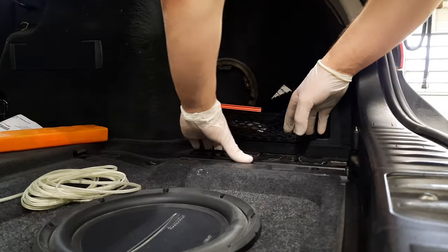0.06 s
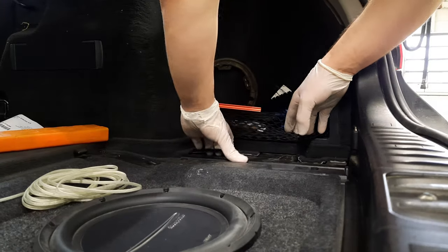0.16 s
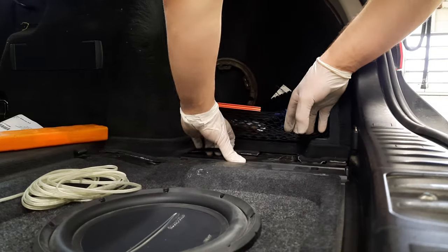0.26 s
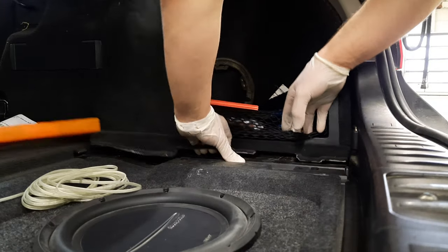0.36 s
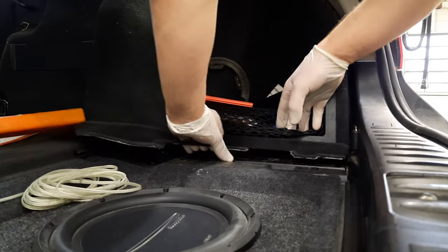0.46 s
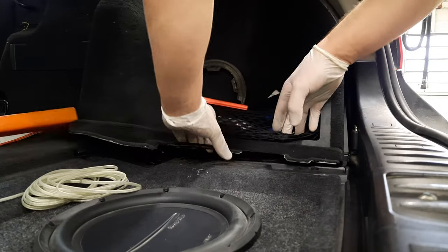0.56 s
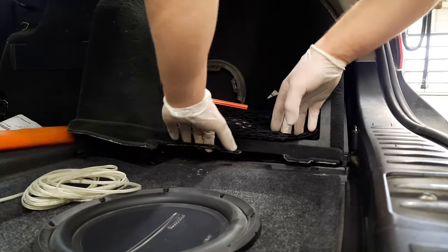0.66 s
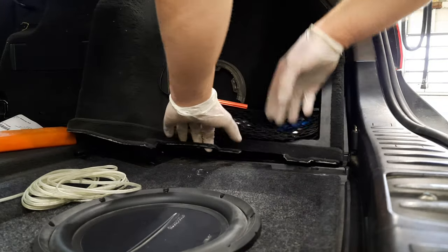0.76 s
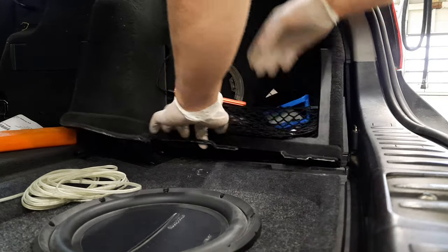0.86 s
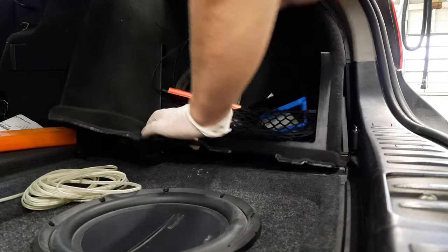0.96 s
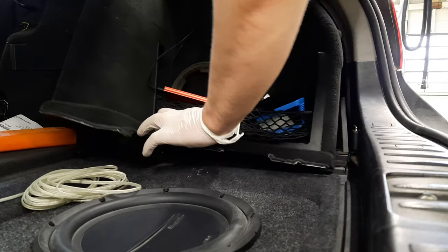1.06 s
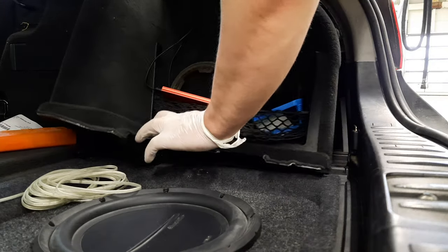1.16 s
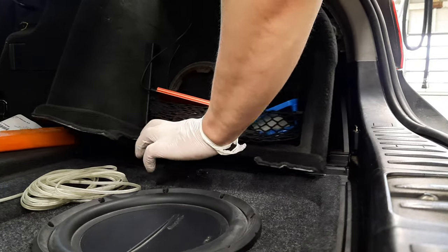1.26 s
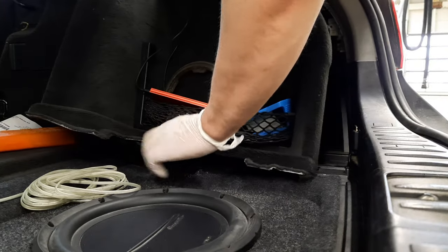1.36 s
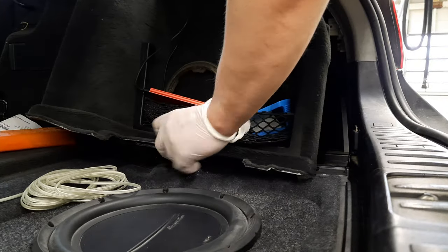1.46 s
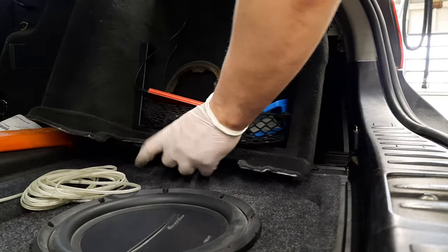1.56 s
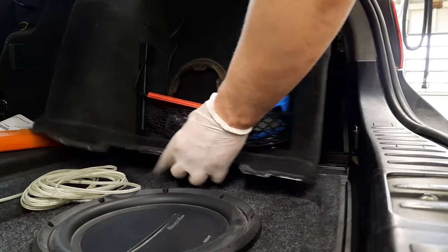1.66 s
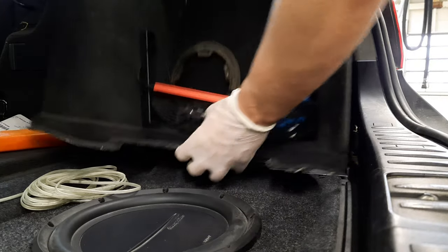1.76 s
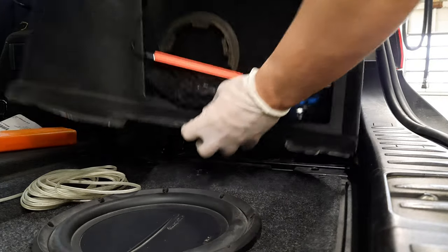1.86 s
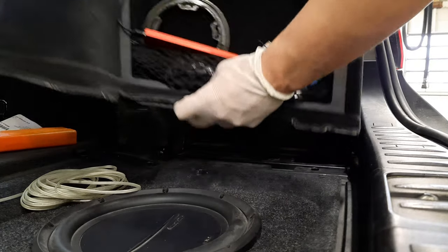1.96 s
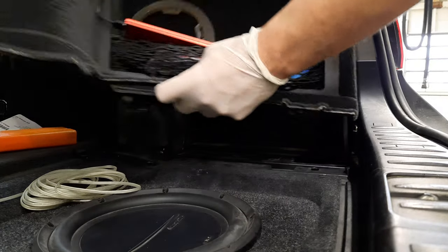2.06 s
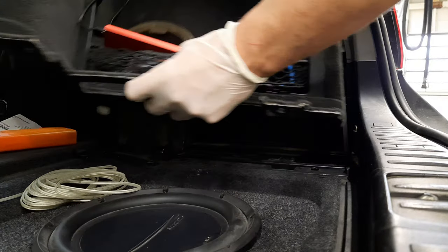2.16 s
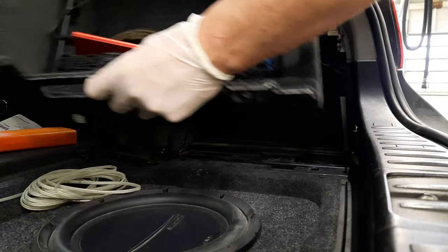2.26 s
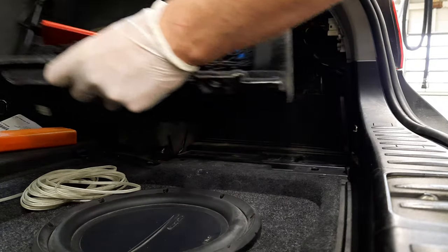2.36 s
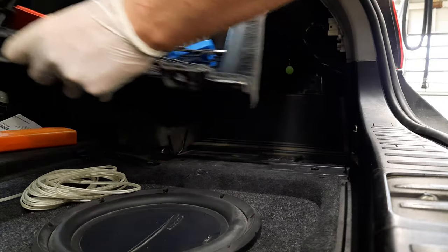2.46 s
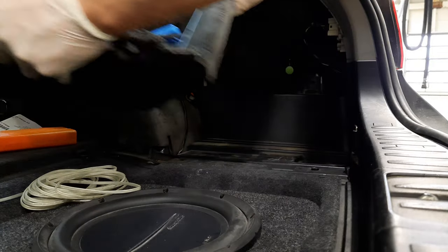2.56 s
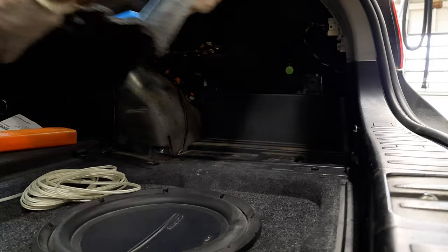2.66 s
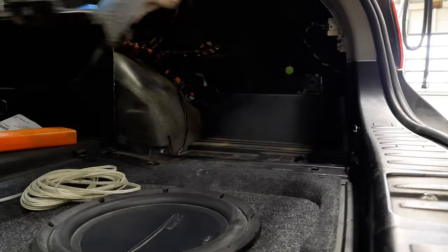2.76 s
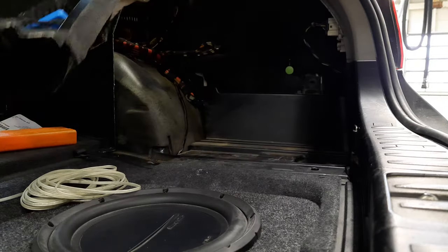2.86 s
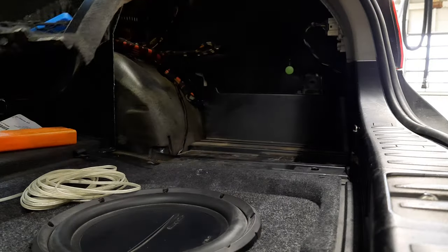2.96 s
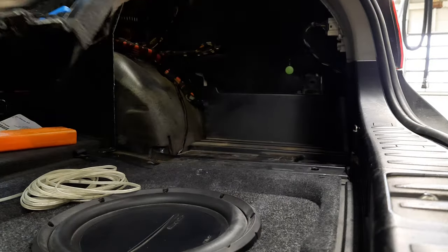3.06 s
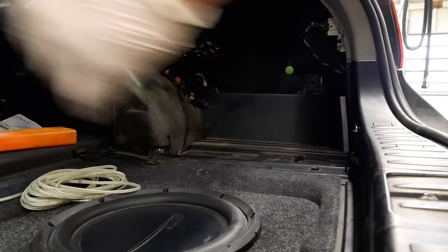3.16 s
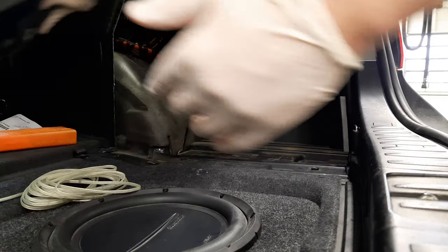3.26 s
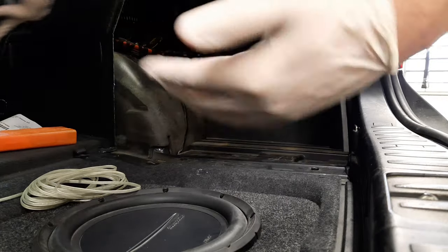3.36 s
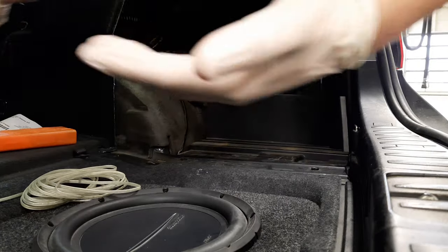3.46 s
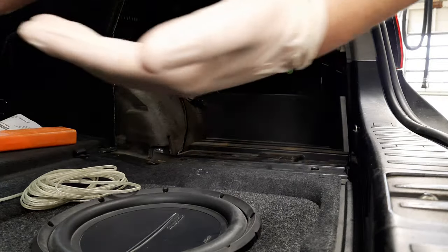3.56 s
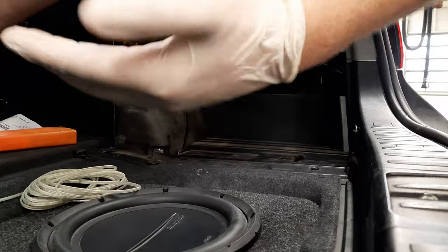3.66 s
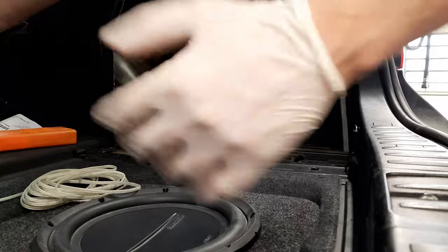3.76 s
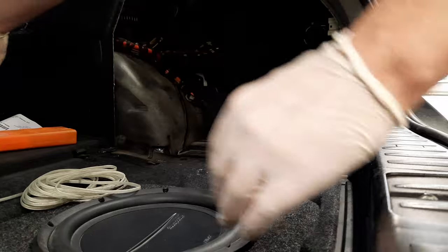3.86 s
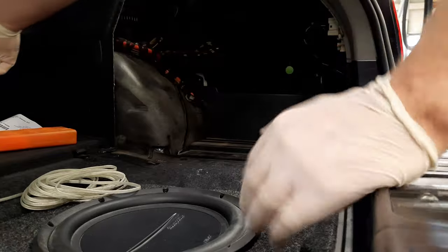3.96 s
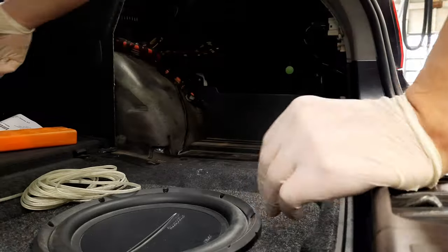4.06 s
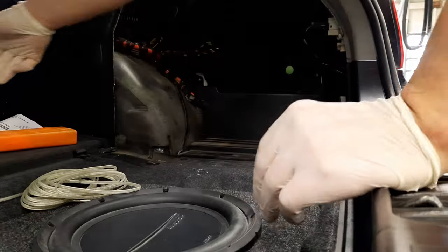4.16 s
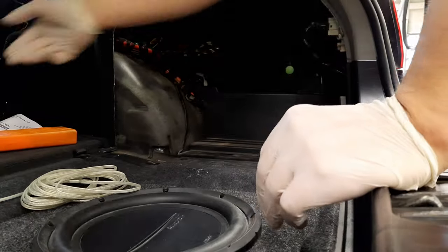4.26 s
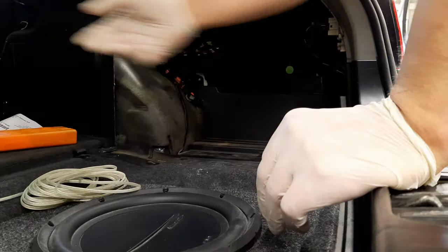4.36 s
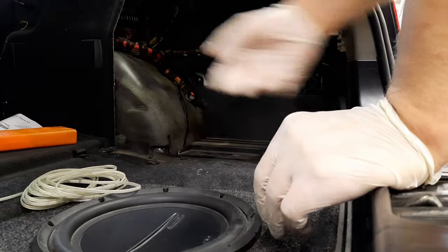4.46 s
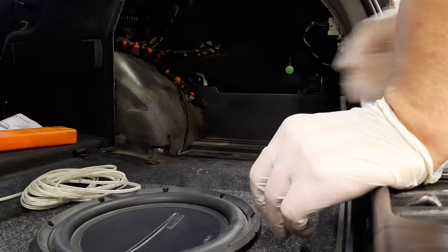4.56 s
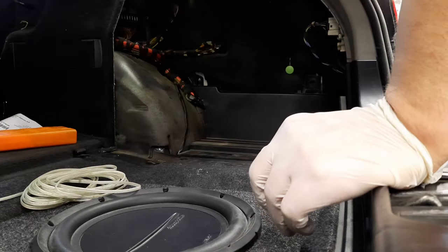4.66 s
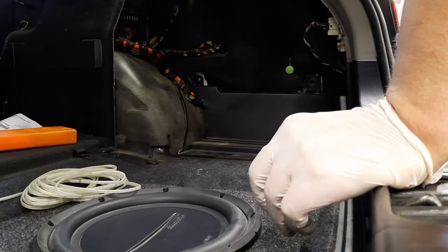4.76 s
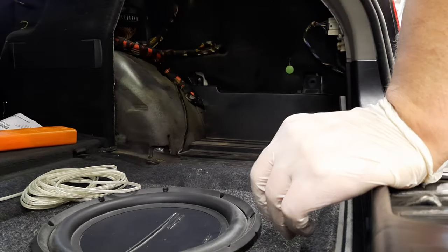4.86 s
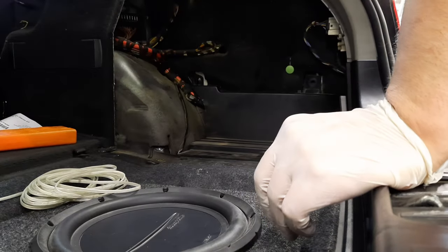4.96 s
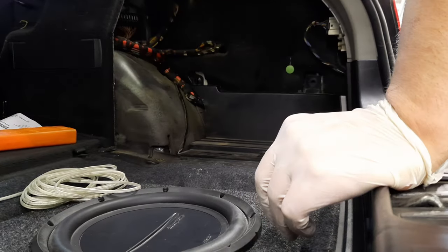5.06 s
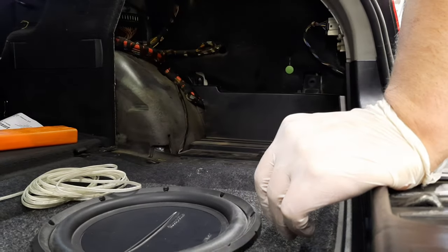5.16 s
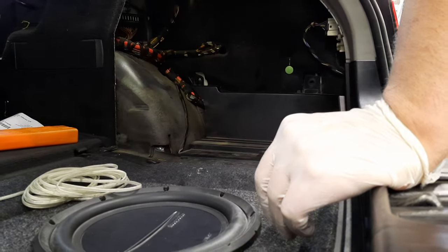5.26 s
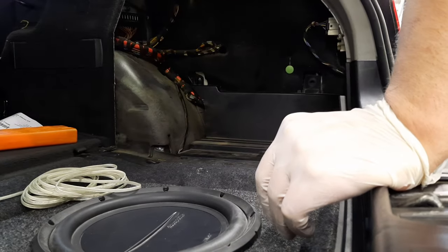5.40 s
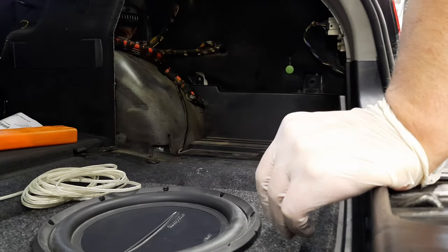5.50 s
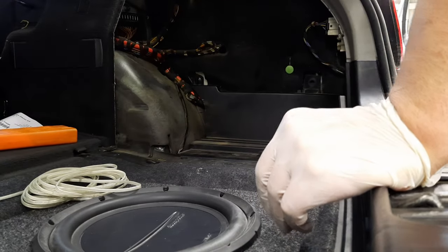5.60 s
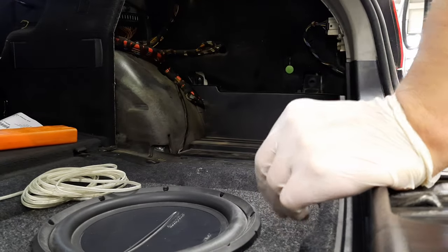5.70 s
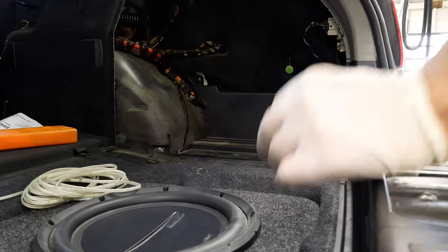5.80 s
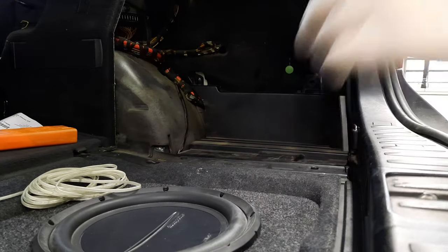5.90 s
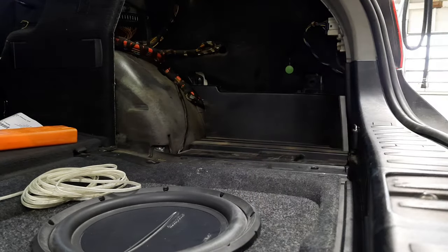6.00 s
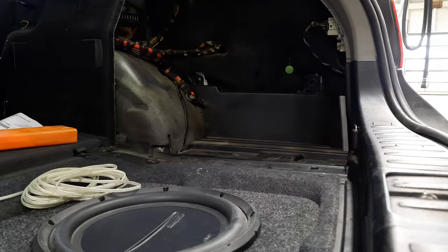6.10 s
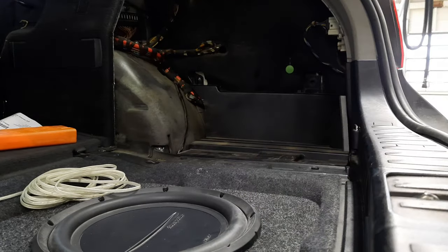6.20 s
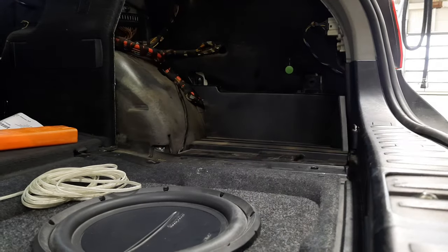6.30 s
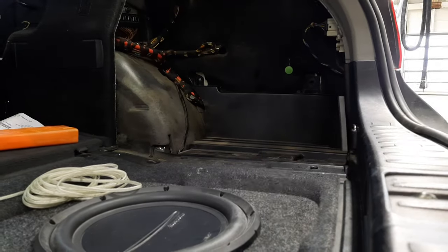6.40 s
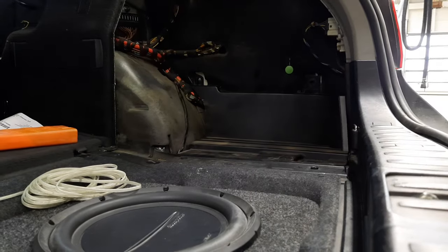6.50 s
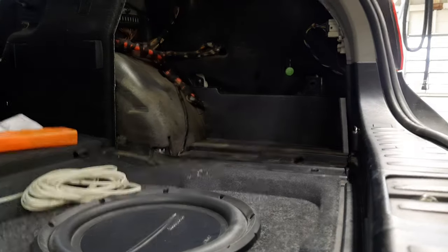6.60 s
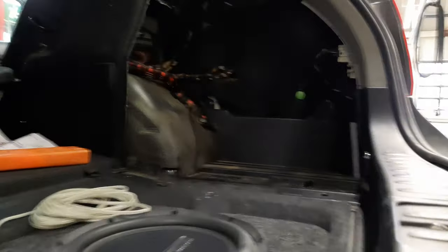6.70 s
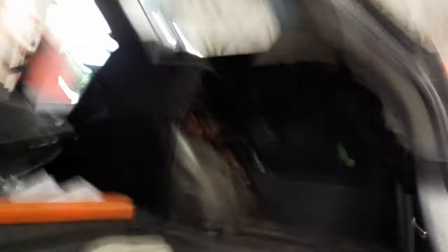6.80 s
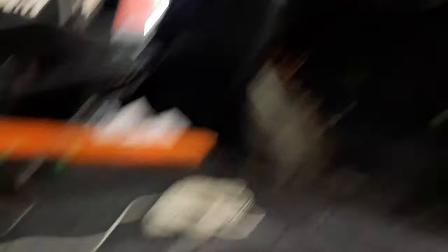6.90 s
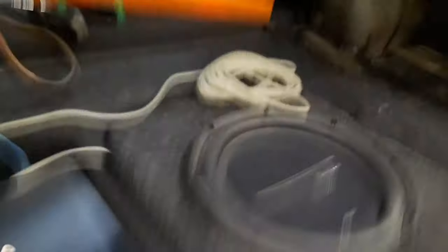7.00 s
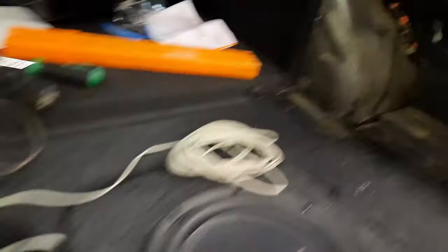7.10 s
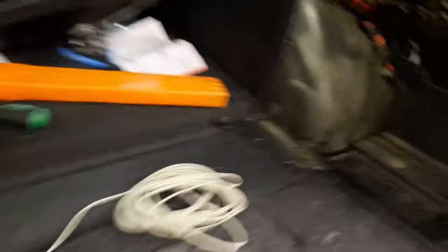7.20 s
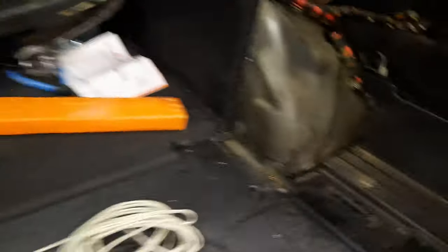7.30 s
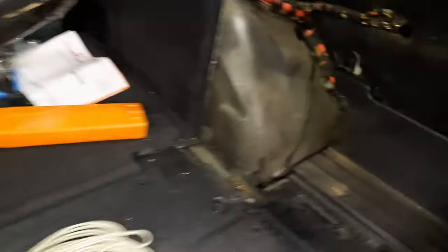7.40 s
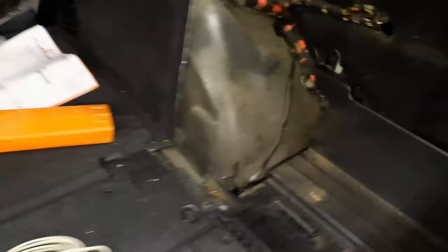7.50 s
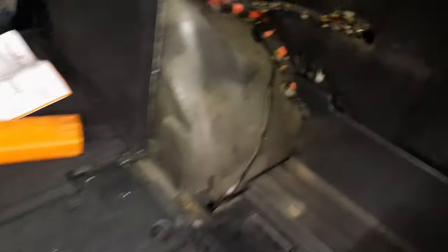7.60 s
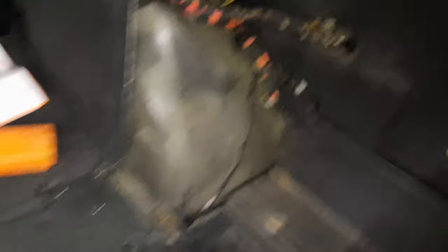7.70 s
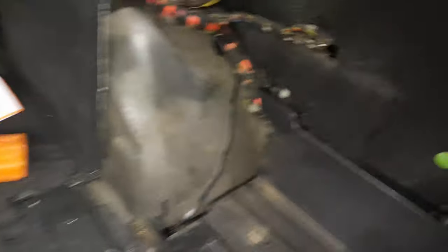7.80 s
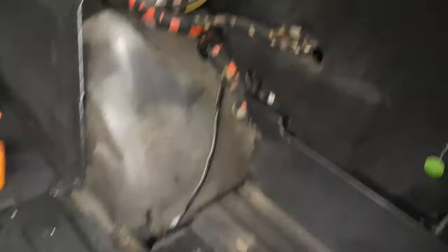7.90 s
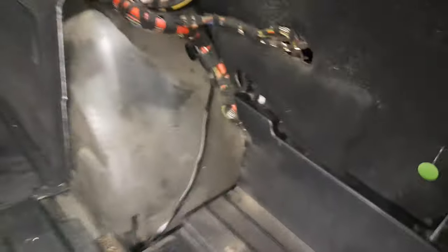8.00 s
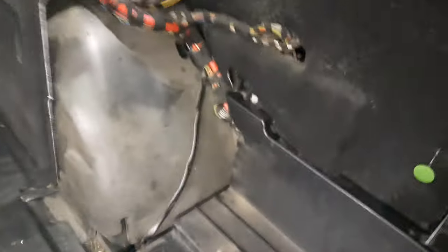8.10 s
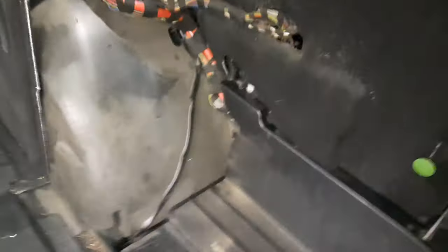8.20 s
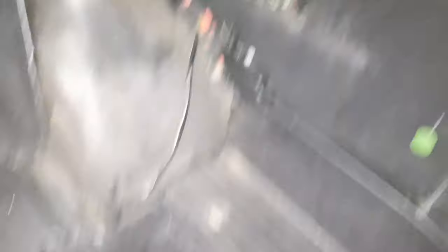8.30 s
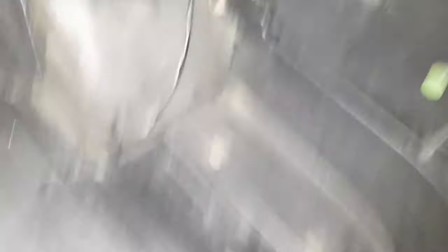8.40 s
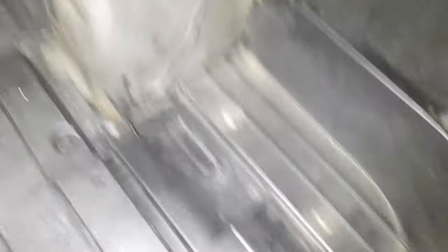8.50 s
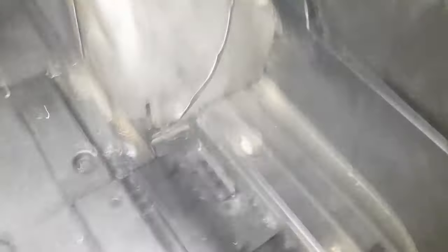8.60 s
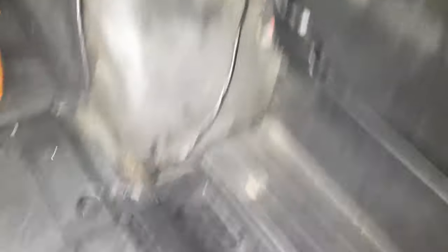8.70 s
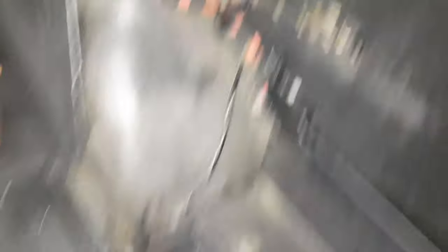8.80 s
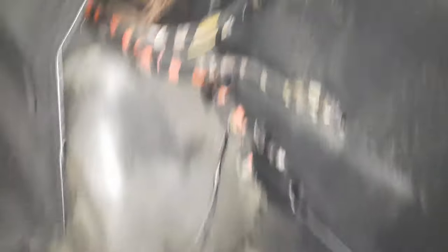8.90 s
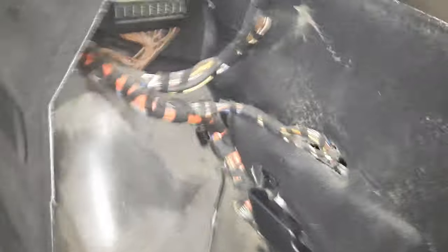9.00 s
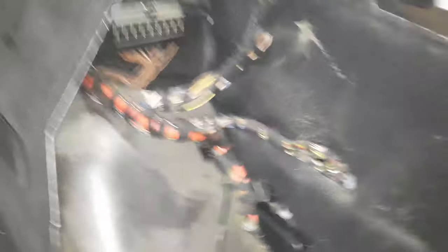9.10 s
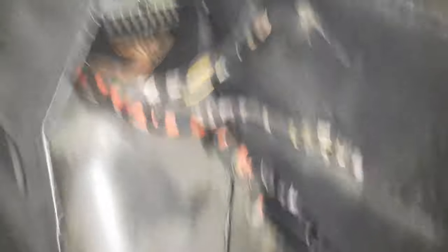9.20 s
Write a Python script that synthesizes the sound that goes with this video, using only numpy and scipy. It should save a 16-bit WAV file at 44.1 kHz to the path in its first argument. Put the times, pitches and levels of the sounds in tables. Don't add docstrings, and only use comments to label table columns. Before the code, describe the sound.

Plastic clips snap loose from a hollow car boot panel, which drags and rattles down with thuds, then hands rub and tap the microphone casing.

```python
import sys
import numpy as np
from scipy import signal
from scipy.fft import rfft, irfft
from scipy.io import wavfile
from scipy.ndimage import uniform_filter1d

SR = 44100
rng = np.random.default_rng(int(sys.argv[2]) if len(sys.argv) > 2 else 0)


def wav_out(sig):
    wavfile.write(sys.argv[1], SR, np.round(np.clip(np.atleast_2d(sig).T, -1, 1) * 32767).astype(np.int16))


def undo_db(level):
    steps = np.asarray(level, float) / 20
    return 10 ** steps


N = 407925
TIME = np.arange(N) / SR


def unit(x):
    return x / np.sqrt(np.mean(x ** 2))


def colour(x, table):
    hz, db = np.transpose(table)
    bin_hz = np.arange(2049) * SR / 4096
    log_gain = np.interp(np.log(bin_hz + 1), np.log(hz), db) * np.log(10) / 20
    cepstrum = irfft(log_gain)
    cepstrum[1:2048] *= 2
    cepstrum[2049:] = 0
    response = irfft(np.exp(rfft(cepstrum)))[:2048]
    response = response / np.linalg.norm(response)
    return signal.oaconvolve(np.atleast_2d(x), response[None], axes=1)[:, :N]


def lean(x, table):
    hz, db = np.transpose(table)
    click = np.eye(1, 2048)[0]
    out = []
    for channel, share in zip(x, (0.5, -0.5)):
        response = colour(click, np.transpose([hz, db * share]))[0]
        response = response / abs(response.sum()) * undo_db(db[0] * share)
        out.append(signal.oaconvolve(channel, response)[:N])
    return np.array(out)


def band(x, lo_hz, hi_hz):
    return signal.sosfilt(signal.butter(2, [lo_hz, min(hi_hz, .45 * SR)], "band", fs=SR, output="sos"), x)


def lowpass(x, hz):
    return signal.sosfilt(signal.butter(1, hz, fs=SR, output="sos"), x)


def pair(alike):
    mid, side = rng.standard_normal((2, N))
    alike = np.clip(alike, 0, 1)
    return np.sqrt((1 + alike) / 2) * mid + np.sqrt((1 - alike) / 2) * side * np.array([[1], [-1]])


def walk(rate_hz):
    hold = int(SR / rate_hz)
    steps = np.repeat(rng.standard_normal(N // hold + 1), hold)
    return uniform_filter1d(steps, hold)[:N] * 1.97


def sides(pan_db):
    gains = undo_db(np.array([pan_db / 2, -pan_db / 2]))
    return 2 * gains / gains.sum(axis=0)


def add(track, s, sound, db, pan_db):
    i = int(s * SR)
    sound = np.atleast_2d(sound)[:, :N - i]
    gain = undo_db(db) * sides(pan_db)[:, None]
    track[:, i:i + sound.shape[1]] += sound / np.abs(sound).max() * gain


def fade(t60_s, rise_s):
    t60_s = max(t60_s, .004)
    t = np.arange(int(SR * t60_s)) / SR
    return t, (1 - np.exp(-t / rise_s)) * np.exp(-np.log(1000) * t / t60_s)


def ring(hz, db, t60_s, rise_s, chance):
    t, env = fade(t60_s, rise_s)
    mode_hz = hz * (1 + 0.044 * chance[0])
    skew = np.array([[.5], [-.5]]) * chance[2] * np.clip(hz / 900, 0, 2)
    waves = np.sin(2 * np.pi * mode_hz[:, None] * t + skew[:, :, None])
    waves = waves * env ** (hz[:, None] / hz[0]) ** 0.14
    return np.einsum("cmt,m->ct", waves, undo_db(db + 5.2 * chance[1]))


def bursts(rows, pans_db, spectrum, t60_mid_s, t60_top_s, ping_db, alike, below, snap_db):
    wide, top, ping = np.zeros((3, 2, N))
    chance = rng.standard_normal((len(rows), 3, 4))
    noise = pair(alike)
    snap = fade(0.007, 0.0001)[1]
    top_env = fade(t60_top_s, 0.000094)[1]
    env = fade(t60_mid_s, 0.0022)[1]
    ping_ratio = np.array([1.014, 1.0, 3.3, 3.0])
    ping_mode_db = np.array([12.5, -8.0, -7.0, -8.0])
    for (s, db, top_db, hz, *_), pan_db, c in zip(rows, pans_db, chance):
        add(wide, s, env, db + 0.29 * (top_db + 7.5) - 4 * np.log2(hz / 1000), pan_db)
        add(top, s, top_env, db + top_db, pan_db)
        add(wide, s, snap, db + 0.3 * top_db + snap_db, pan_db)
        add(top, s, snap, db + top_db + snap_db - 5.5, pan_db)
        part_db = db + 2 * max(top_db, 0) + ping_db
        piece = env * noise[:, int(s * SR):][:, :len(env)]
        add(ping, s, band(piece, hz / below, hz * 1.48), part_db + 2.5, pan_db)
        modes = ring(hz * ping_ratio, ping_mode_db, 0.87 * t60_mid_s, 0.000098, c)
        add(ping, s, modes, part_db - 2.5, pan_db)
    wide = band(wide * pair(alike), 1190, 4800) * undo_db(-5.5)
    top = band(top * pair(alike), 3900, 23600) * undo_db(8.0)
    return colour(wide + top, spectrum) + ping


# (time [s], crack peak [dB], treble rel [dB], face ring rel [dB], rib ring rel [dB])
CLIPS = [(0.055, -24, -1.5, 4, 0), (0.352, -27, -10, 5, 5), (0.373, -24, -11, -2, 1),
         (.386, -26.5, -20, -1, 2.5), (.476, -35, -9, 4, -4), (0.497, -35, -8, 10, -6),
         (0.5842, -29, -27, 7, 7), (0.6308, -9.5, -30, -5.5, -5), (0.7448, -20.5, -16.5, -11, -6),
         (1.0129, -16.5, -21.5, -2.5, -1), (1.052, -25.5, -40, 5, 3), (1.074, -18, -74, -9, -18),
         (1.379, -33.5, -29, 0, 4), (1.3995, -21, -67, -4.5, -2), (1.6448, -34, -12, 0, 0),
         (1.673, -24, -23, 10, 1.5), (1.7538, -22.5, -24, 6.5, 0), (1.7739, -25.5, -21, -1.5, 6)]
RATTLES = [(3.7191, -32, -5.5, 10, 2.5), (3.7902, -34, -9, -1, -1), (4.001, -24.5, -4.5, -12, -4),
           (4.008, -21.5, -7, -13, -7), (4.0125, -17, -11.5, 4, -4), (4.0471, -26.5, -20, 5.5, 9),
           (4.074, -26, -14, -2, -3), (4.0636, -16, -11.5, -4, -4), (4.0875, -18.5, -12, 2, 1),
           (4.108, -23, -6, -4, -17), (4.133, -21.5, -13, -19, -7), (4.154, -15.5, -9, -7, -4.5),
           (4.2778, -20.5, -8, -3, 3), (5.036, -35, -5, -6, 4), (5.02, -18, -3.5, -3.5, -6.5),
           (5.0791, -25, 0, -18, 0), (5.1802, -18.5, -4.5, -4, -14), (5.7402, -12.5, -7, -12, -5),
           (5.7794, -20, -13.5, -9, -17), (5.806, -20.5, -9, -7, 0), (5.8248, -23, -5.5, 3, -1),
           (5.8422, -19, -13, 0.5, -8), (5.853, -25, -18, -3, -3)]
# (time [s], crack peak [dB], treble rel [dB], ping [Hz], face ring rel [dB])
LOOSE_PARTS = [(0.304, -28.5, -9.5, 2340, -5.5), (0.7275, -14, -25, 1883, -13), (0.408, -18, -8, 2500, -2),
               (0.536, -19, -18, 2400, -24), (0.7921, -23, -13, 2690, -6.5), (0.683, -37, -15, 1990, 5),
               (0.989, -36.5, -28, 1690, -6), (1.122, -42, -25, 2000, -17), (2.125, -47.5, 1, 2440, 0),
               (4.182, -44, -12, 5500, -20), (5.125, -42, -25, 1300, -10), (1.509, -31, -16, 2450, -8),
               (2.58, -35, -15, 2600, -6), (2.7449, -30, -6, 4600, -10), (5.7645, -34, -5, 6500, -15),
               (5.706, -36, -10, 1100, -10), (0.7925, -27, -20, 3900, -20), (2.77, -32, -8.5, 1320, -8),
               (2.838, -25, -13, 2600, -5.5), (4.418, -15, -14, 1900, -8), (5.0637, -18, -8, 2020, -6),
               (5.9129, -21.5, -19, 2310, -14), (6.35, -43.5, -3.5, 2430, -22)]
# (frequency [Hz], density [dB per Hz])
CRACK_SPECTRUM = [(530, -10.5), (950, -4.5), (1500, -10.5), (4500, -18.5), (8000, -21), (16000, -30.5)]
# (frequency [Hz], level [dB])
FACE_MODES = [(305, -2), (340, -2), (375, -5), (425, -6.5)]
# (frequency [Hz], level [dB])
RIB_MODES = [(530, 3.5), (590, 2), (725, -2.5), (840, -7.5), (915, -0.5), (1040, -8)]
# (time [s], left minus right [dB])
PANEL_PAN = [
    (0.4, 4),
    (1.05, 3.5),
    (1.75, 1.5),
    (2.8, 3),
    (3.75, 3),
    (4.0, 7),
    (5.1, 5),
    (5.8, 6.5),
]


def snaps():
    hits = CLIPS + RATTLES
    pings_hz = 968 * (1 + 0.063 * rng.standard_normal(len(hits)))
    rows = []
    for (s, db, top_db, face_db, rib_db), hz in zip(hits, pings_hz):
        rows.append((s, db, top_db, hz, face_db, rib_db))
    for row in LOOSE_PARTS:
        rows.append((*row, row[-1] - 1))
    pans_db = np.interp(np.transpose(rows)[0], *np.transpose(PANEL_PAN))
    pans_db = pans_db + 0.47 * rng.standard_normal(len(rows))
    out = bursts(rows, pans_db, CRACK_SPECTRUM, t60_mid_s=0.044, t60_top_s=0.028, ping_db=-4.5,
                 alike=0.032, below=2.2, snap_db=-2.5)
    ribs = len(RIB_MODES)
    chance = rng.standard_normal((len(rows), 3, ribs + len(FACE_MODES)))
    for (s, crack_db, *_, face_db, rib_db), pan_db, c in zip(rows, pans_db, chance):
        face = ring(*np.transpose(FACE_MODES), 0.12, 0.0019, c[:, ribs:])
        add(out, s, face, crack_db + face_db, pan_db)
        rib = ring(*np.transpose(RIB_MODES), 0.051, 0.0029, c[:, :ribs])
        add(out, s, rib, crack_db + rib_db, pan_db)
    return out


# (time [s], peak [dB], pitch [Hz], t60 [s])
BLOWS = [(0.355, -25, 101, 0.36), (0.409, -22.5, 83.6, 0.35), (0.489, -22, 66.2, 1),
         (0.6307, -11, 1028, 0.049), (0.6309, -14, 530, 0.043), (0.733, -10.5, 498, 0.074),
         (0.729, -17, 125.4, 0.23), (0.743, -13.5, 68.6, 0.33), (1.036, -14.5, 103, 0.22),
         (1.282, -31, 276, 0.053), (1.409, -22, 96, 0.27), (1.691, -17.5, 290, 0.13),
         (1.758, -13, 297, 0.069), (3.717, -8.5, 112.5, 0.12), (3.737, -15, 62.5, 0.18),
         (3.777, -11.5, 80.3, 0.13), (4.0167, -8, 322, 0.06), (4.42, -25.5, 800, 0.048),
         (5.194, -23.5, 333, 0.064), (5.741, -10.5, 960, 0.028), (5.75, -7, 314, 0.15),
         (5.843, -18, 323, 0.16)]
# (time [s], peak [dB], pitch [Hz], t60 [s], left minus right [dB])
BUMPS = [
    (6.674, -13, 152, 0.071, 39),
    (6.689, -15.5, 60, 0.13, 33),
    (6.911, -8, 358, 0.028, 37),
    (8.632, -22, 310, 0.023, 32),
    (8.675, -21.5, 296, 0.046, 22),
    (8.781, -19.5, 78.5, 0.049, 8),
    (8.826, -20, 159, 0.055, 15),
    (9.237, -29, 338, 0.038, 25),
]


def knocks():
    rows = [(*row, np.interp(row[0], *np.transpose(PANEL_PAN))) for row in BLOWS] + BUMPS
    out = np.zeros((2, N))
    chance = rng.standard_normal((len(rows), 3, 3))
    for (s, db, hz, t60_s, pan_db), c in zip(rows, chance):
        modes = ring(hz * np.array([1, 1.4, 2.2]), np.array([0, -11, -15]), t60_s, 0.18 / hz, 0.5 * c)
        add(out, s, modes, db, pan_db)
    return out


# (middle [s], peak [dB], pitch [Hz], length [s], left minus right [dB])
PUSHES = [(0.263, -24, 295, .07, 2), (.515, -21.5, 93.6, .06, 6), (1.769, -19, 306, .04, -3),
          (2.571, -33.5, 294, 0.041, 2), (2.565, -39, 140, 0.039, 5), (2.672, -36, 302, .03, 1),
          (4.171, -20, 323, .035, 8), (4.038, -20, 300, .03, 8), (4.104, -25, 340, .03, 8),
          (5.795, -24, 330, .04, 8), (5.888, -27, 330, .04, 7), (.592, -28, 520, .05, 4),
          (8.489, -24, 330, .014, 30), (6.961, -29, 400, .012, 27), (8.471, -23.5, 288, .022, 30),
          (8.651, -33, 256, .025, 11), (8.69, -26.5, 300, .025, 10), (8.842, -24, 84, .04, 10),
          (8.363, -34.5, 490, .012, 17)]


def pushes():
    out = np.zeros((2, N))
    for (s, db, hz, length_s, pan_db), c in zip(PUSHES, rng.standard_normal((len(PUSHES), 2))):
        t = np.arange(int(length_s * SR)) / SR
        tone = np.sin(2 * np.pi * hz * t + c[0])
        tone = tone + 0.31 * np.sin(2 * np.pi * 1.45 * hz * t + c[1])
        add(out, s - length_s / 2, tone * np.sin(np.pi * t / length_s), db, pan_db)
    return out


def friction(spectrum, body, grain_db, patchy_db):
    grains = pair(0.023) * undo_db(grain_db * walk(400) + patchy_db * walk(40))
    shake = pair(.8) * undo_db(2.5 * walk(60))
    return unit(colour(grains, spectrum)), unit(colour(shake, body))


def strokes(rows, pans_db, hiss, rumble, touch):
    power = np.zeros((3, 2, N))
    for (s, length_s, db, firm_db, *_), pan_db in zip(rows, pans_db):
        near = slice(max(int((s - length_s / 2) * SR), 0), int((s + length_s / 2) * SR))
        arch = np.clip(np.cos(np.pi * (TIME[near] - s) / length_s), 0, 1) ** 1.55
        shares = undo_db(db + np.array([0, -touch * firm_db, firm_db]))
        power[:, :, near] += (shares[:, None, None] * sides(pan_db)[:, None] * arch) ** 2
    dull = lowpass(hiss, 3500)
    edge = undo_db(-4.5) * (hiss - dull)
    return np.sum(np.sqrt(power) * [dull, edge, rumble], axis=0)


# (middle [s], length [s], rustle or hiss [dB],
# body rumble rel [dB])
DRAG_STROKES = [(0.07, 0.42, -44, -1.5), (0.27, 0.15, -44.5, -1), (0.395, 0.13, -33.5, 0),
                (0.49, 0.15, -39, 1.5), (0.595, 0.13, -38, 4), (0.76, 0.12, -42, 6),
                (0.93, 0.86, -53.5, -2), (1.08, 0.12, -43, 3.5), (1.42, 0.55, -54.5, -2),
                (1.7, 0.27, -49.5, 3), (2.69, 0.13, -52, -1.5), (2.81, 0.19, -55, 0), (4.09, 0.2, -37, -2),
                (4.045, .06, -36, 1.5), (2.765, 0.039, -52, -2.5), (4.43, 0.35, -50, -16),
                (4.85, 0.4, -55, -27), (3.81, 0.27, -51.5, -0.5), (5.765, 0.033, -39.5, 3),
                (5.853, 0.054, -37, -6), (5.81, 0.31, -42, 1), (5.95, 0.49, -54.5, -8),
                (7.72, 0.33, -54.5, 0), (7.9, 0.7, -56, -2)]
# (frequency [Hz], density [dB per Hz])
RUSTLE_SPECTRUM = [(410, -43), (800, 2), (2600, -4), (8000, -16.5), (16000, -25)]


def drag():
    body = [(40, -20.0), (90, 9.5), (180, 3.5), (310, 0.5), (550, -4.0), (1100, -13.0), (2000, -39.5)]
    hiss, rumble = friction(RUSTLE_SPECTRUM, body, grain_db=1.55, patchy_db=1.4)
    return strokes(DRAG_STROKES, np.full(len(DRAG_STROKES), 2.5), hiss, undo_db(8.5) * rumble, touch=0.3)


# (middle [s], length [s], level [dB], centre [Hz], left minus right [dB])
SCUFFS = [(4.853, 0.13, -55, 6000, -8), (6.947, .07, -41, 2980, 26), (7.104, .05, -48, 4000, 14),
          (2.702, .06, -57, 5500, 2.5), (2.716, .014, -47, 10000, 4), (2.717, .012, -53, 4500, 1),
          (2.845, 0.016, -39, 2400, 5), (2.772, .008, -51, 6700, 4), (5.09, .03, -44, 3500, 5),
          (1.094, .012, -52, 5300, 3), (5.916, 0.014, -40, 2900, 7), (0.539, 0.022, -33.5, 2200, 6),
          (1.69, .03, -51.5, 4500, 0), (3.742, 0.042, -50, 4030, -1), (7.498, 0.0072, -49, 900, 7),
          (7.606, 0.0045, -49, 4000, 13), (7.676, .004, -54, 8000, 12), (7.688, .004, -55, 6000, 12),
          (7.712, .006, -55, 1500, 12), (7.91, .004, -59, 7050, 12), (8.067, 0.004, -53, 4500, -4),
          (8.331, 0.0071, -37, 11500, 20), (6.836, 0.059, -33.5, 2190, 37), (8.362, .12, -54, 5500, -5),
          (8.464, 0.049, -50, 5200, -2), (8.647, .06, -42.5, 5500, -12), (8.823, 0.15, -42, 5840, -11),
          (8.995, .25, -53, 5500, -2), (9.124, .1, -48, 5500, -5)]


def scuffs():
    width = 1.3
    out = np.zeros((2, N))
    grains = pair(.1) * undo_db(2.1 * walk(500))
    for s, length_s, db, hz, pan_db in SCUFFS:
        t = np.arange(int(length_s * SR)) / SR
        piece = grains[:, int((s - length_s / 2) * SR):][:, :len(t)]
        scuff = band(piece, hz / width, hz * width) * np.sin(np.pi * t / length_s)
        add(out, s - length_s / 2, scuff, db + 12.5, pan_db)
    return out


# (frequency [Hz], density [dB per Hz])
SKIN_SPECTRUM = [(290, -21), (600, -2), (1600, -6), (3300, -12.5), (7000, -15.5), (16000, -21)]
# (middle [s], length [s], hiss [dB], rumble rel [dB], left minus right [dB])
RUB_STROKES = [(6.737, 0.29, -49.5, 6, 30), (6.841, 0.13, -33.5, -2.5, 40), (6.936, 0.14, -34.5, -1, 34),
               (6.914, 0.41, -37.5, 0, 31), (7.091, 0.15, -39.5, -3.5, 12), (7.178, 0.084, -43, -18, 25),
               (7.253, 0.28, -47.5, -5, 27), (7.44, 1, -56.5, -5, 13), (8.317, 0.8, -52, -6, 5),
               (8.436, 0.36, -44, -1, 8), (8.645, 0.17, -41, -6, 2), (8.73, 0.42, -43.5, -9, -4),
               (8.882, 0.31, -39.5, -6, 7), (9.027, 0.067, -42, -6, 15), (9.165, 0.34, -43, -6.5, 14),
               (9.25, 0.13, -35, -1.5, 18)]


def rub():
    body = [(40, 3.5), (90, 3.0), (300, 7), (600, -5.0), (1200, -15.0), (2000, -42)]
    hiss, rumble = friction(SKIN_SPECTRUM, body, grain_db=1.4, patchy_db=0.2)
    return strokes(RUB_STROKES, np.transpose(RUB_STROKES)[-1], hiss, undo_db(3.5) * rumble, touch=0.8)


# (time [s], tick peak [dB], treble rel [dB], pop rel [dB], pop [Hz])
THUMB = [(6.673, -28, -10, 4, 300), (6.9125, -26, -25, 10, 700), (8.467, -36, -25, 12, 650),
         (6.6778, -16, -19, 10, 292), (6.6854, -16, -17, 6.5, 587), (6.6918, -20, -34, 10.5, 347),
         (6.7185, -37, -0.5, -5, 446), (6.769, -30, -9, 0.5, 453), (6.8753, -20, -15, -7, 497),
         (6.8984, -8, -31, -7, 690), (7.6053, -28.5, -25, 9, 577), (7.6945, -42, -5, 11, 443),
         (7.729, -44.5, -22, 18.5, 382), (7.7687, -38.5, -33, 11, 474), (8.271, -31, -24, 2, 604),
         (8.337, -32, -27, 4, 527), (8.409, -47.5, -15, 20.5, 398), (8.437, -38.5, -15, 15, 450),
         (8.4815, -25.5, -15, 20.5, 512), (8.755, -43.5, -15, 16.5, 500), (8.9486, -44.5, 0, 26.5, 506),
         (6.8186, -21, -24, -4, 500), (6.8925, -18, -25, -7, 604), (8.802, -39, -12, 5, 500),
         (9.2249, -34.5, 3, 10, 450)]
# (time [s], tick peak [dB], treble rel [dB], ping [Hz], left minus right [dB])
CREAKS = [(7.3151, -41, -1, 6000, 17), (6.735, -40, -29, 12500, 14), (7.0546, -36, -15, 1200, -1),
          (7.3023, -44, -1, 3000, 12), (8.123, -50, -10, 6000, 5), (8.45, -32, -16, 5000, 4),
          (8.746, -32, -29, 4600, -6), (8.901, -40, -25, 1500, 3), (8.917, -30, -15, 2500, 3),
          (8.9488, -21, 0, 4500, 7), (9.003, -42, -20, 12000, 3), (7.64, -43, -7, 9050, 12),
          (7.7391, -43, -0.5, 7200, 19), (8.0642, -42, -19, 3440, -4), (8.077, -26.5, -9, 3600, 2),
          (8.18, -23, -24, 3700, 3), (8.1975, -28, -23, 2370, -6), (8.237, -31.5, -41, 1500, 0),
          (8.331, -27, -37, 11300, 22), (8.549, -28, -30, 2630, 6), (8.6035, -46, 6, 4600, -9),
          (8.786, -24.5, -10, 7400, -14), (8.9417, -17, -2.5, 2490, -12), (9.019, -27, -25, 4420, -9),
          (9.175, -41, 5.5, 4200, 15)]


def taps():
    thumb_ping_hz, thumb_pan_db, pop_cycles = 1310, 53, 0.42
    rows = [(s, db, top_db, thumb_ping_hz, thumb_pan_db) for s, db, top_db, *_ in THUMB] + CREAKS
    out = bursts(rows, np.transpose(rows)[-1], SKIN_SPECTRUM, t60_mid_s=0.01, t60_top_s=0.0033,
                 ping_db=-6.0, alike=0.059, below=1.7, snap_db=-3.0)
    for s, tick_db, _, pop_db, hz in THUMB:
        cycles = np.arange(int(3 * SR / hz)) * hz / SR - 1
        window = np.exp(-(cycles / pop_cycles) ** 2)
        swing = np.cos(2 * np.pi * cycles)
        pop = (np.average(swing, weights=window) - swing) * window
        add(out, s - 0.398 / hz, pop, tick_db + pop_db, thumb_pan_db)
    return out


def boot(x, t60_s, top_hz):
    tail = rng.standard_normal((2, int(SR * t60_s))) * fade(t60_s, 0.0029)[1]
    tail = band(tail, 130, top_hz)
    return signal.oaconvolve(x, tail / np.linalg.norm(tail[0]), axes=1)[:, :N]


# (frequency [Hz], density [dB per Hz])
HUM_SPECTRUM = [(18, -48), (60, -1), (140, -18.5), (185, -29.5), (290, -7.5), (420, -22.5), (1000, -24),
                (1150, -28.5), (2000, -26), (3200, -34), (4400, -32.5), (8000, -41.5), (16000, -42)]
# (frequency [Hz], left minus right [dB])
HUM_LEAN = [(60, 1.5), (500, -3), (1800, 1), (5000, 0)]
# (frequency [Hz], width [Hz], level [dB])
BOOT_AIR = [(94.6, 15, -46), (137.3, 11.7, -45), (268, 23, -56), (306, 22.3, -53.5), (340.5, 22.7, -56.5)]
# (time [s], broad level [dB], boot mode level [dB])
HUM = [
    (0, -48.5, 0.5),
    (4.3, -47.5, -0.5),
    (6.6, -47.5, -2),
    (7.3, -49, -6.5),
    (7.95, -53.5, -9),
    (9.25, -41.5, -1),
]


def shop():
    hum_s, *levels = np.transpose(HUM)
    broad_db, mode_db = [np.interp(TIME, hum_s, level) for level in levels]
    common, apart = pair(1.0), pair(0)
    air = colour(lowpass(common - apart, 450) + apart, HUM_SPECTRUM)
    left = colour(air[0], [(f, db * .5) for f, db in HUM_LEAN])[0]
    right = colour(air[1], [(f, db * -.5) for f, db in HUM_LEAN])[0]
    stir = pair(0.91)
    sway_db = .8 * walk(6)
    modes = sum(undo_db(db + sway_db) * unit(band(stir, f - w / 2, f + w / 2)) for f, w, db in BOOT_AIR)
    broad = undo_db(broad_db + 0.12 * walk(1.64)) * unit(np.array([left, right]))
    return broad + undo_db(mode_db) * modes


# (frequency [Hz], left minus right [dB])
PANEL_LEAN = [(250, 0.5), (800, 2), (2500, -0.2), (6000, -7.5), (12000, -1.5)]


def scene():
    panel = lean(snaps() + drag(), PANEL_LEAN)
    panel = panel + undo_db(-19.0) * boot(panel, t60_s=0.12, top_hz=2940)
    return panel + knocks() + pushes() + taps() + rub() + scuffs() + shop()


def band_limit(x):
    return signal.sosfilt(signal.butter(12, 16800, fs=SR, output="sos"), x)


# (frequency [Hz], level [dB])
MIC_PORT = [(7900, 1.5), (8700, -5), (10100, -4.5), (11000, 2.5), (12900, 0.5), (14250, 5.5), (14900, -1.5),
            (15600, 0.5), (16300, -22), (17200, -48)]


def record(dry):
    x = colour(dry, MIC_PORT) * undo_db(-1.5)
    x = signal.sosfilt(signal.butter(2, 45, "high", fs=SR, output="sos"), x)
    mix = np.clip(x, -1, 1)
    return band_limit(mix)


dry = scene()
out = record(dry)
wav_out(out)
```